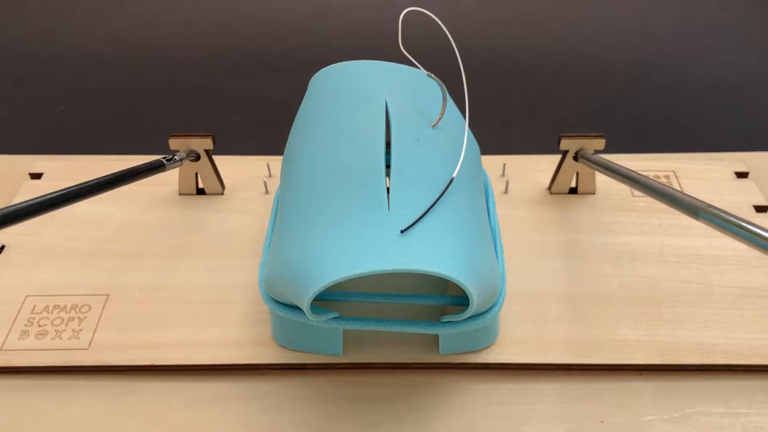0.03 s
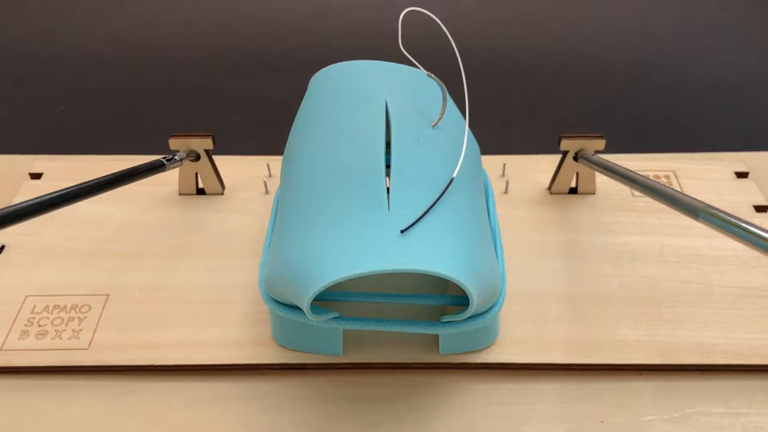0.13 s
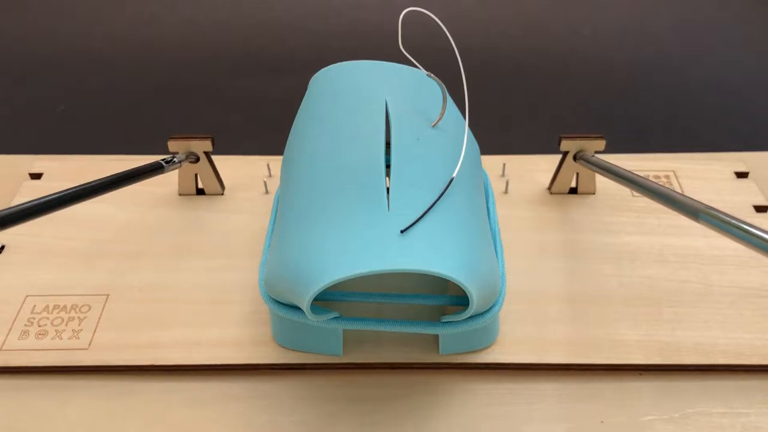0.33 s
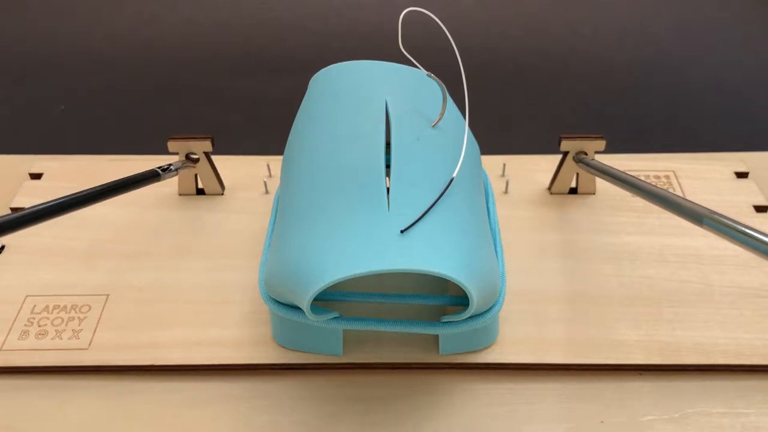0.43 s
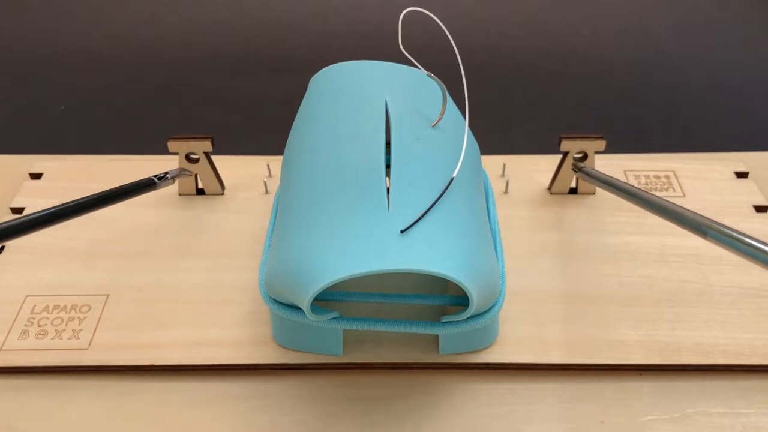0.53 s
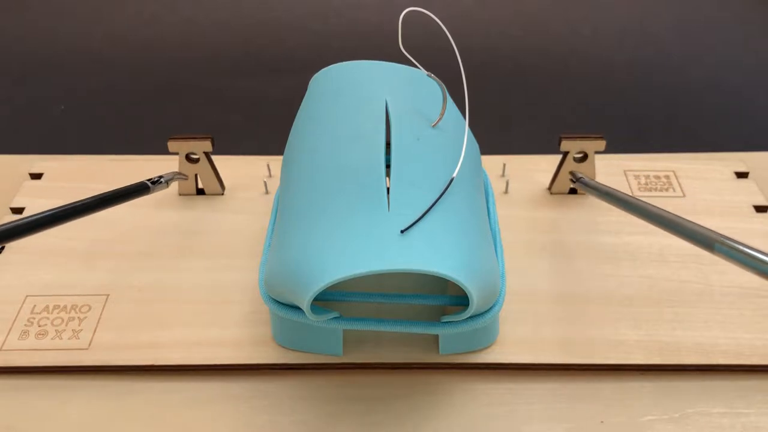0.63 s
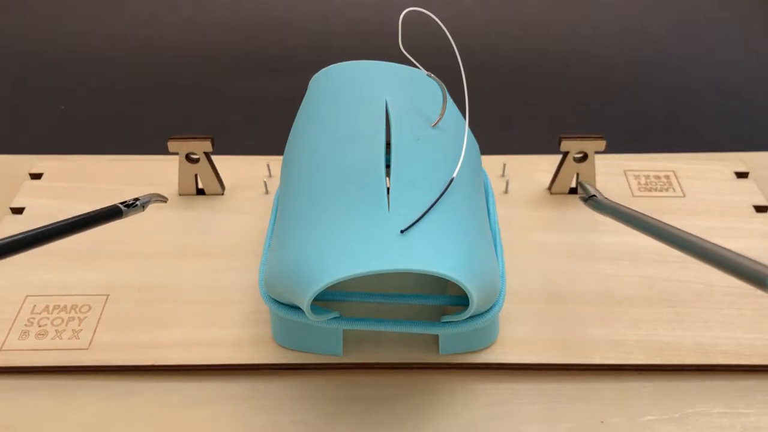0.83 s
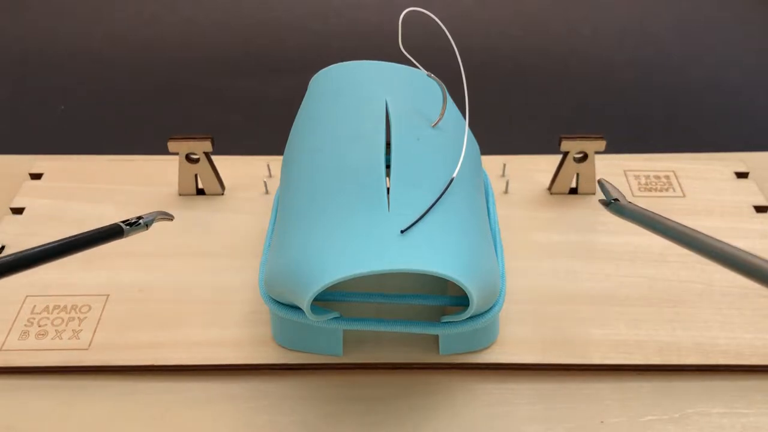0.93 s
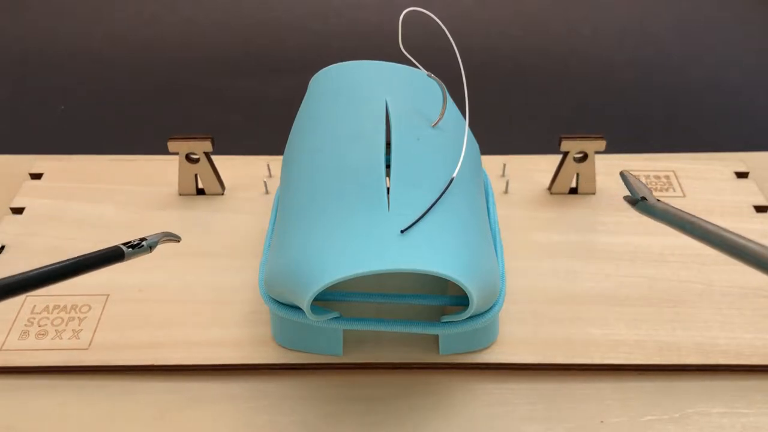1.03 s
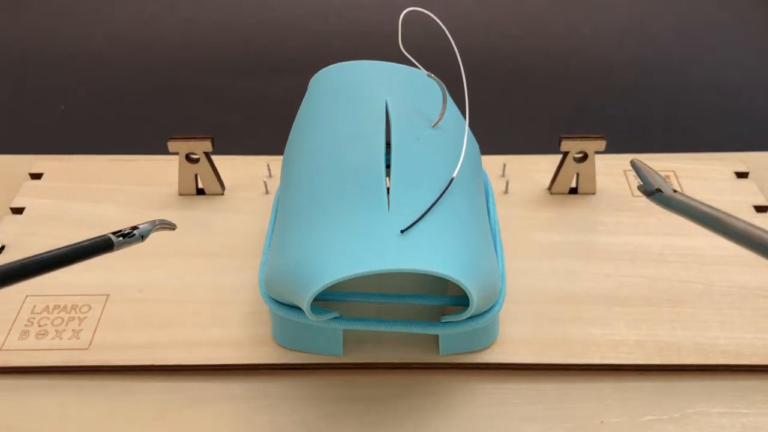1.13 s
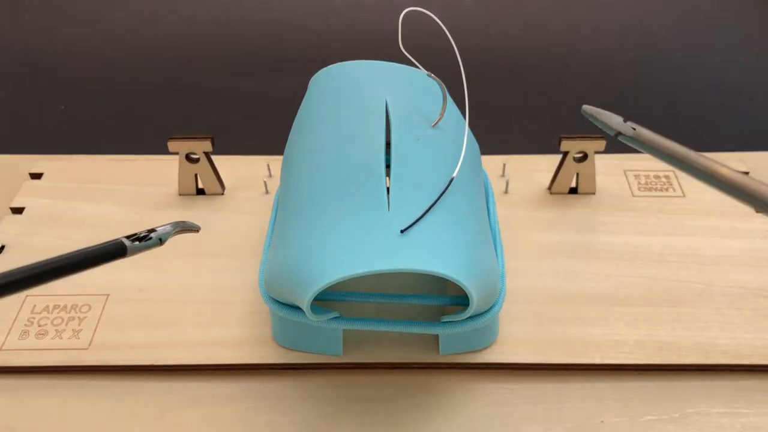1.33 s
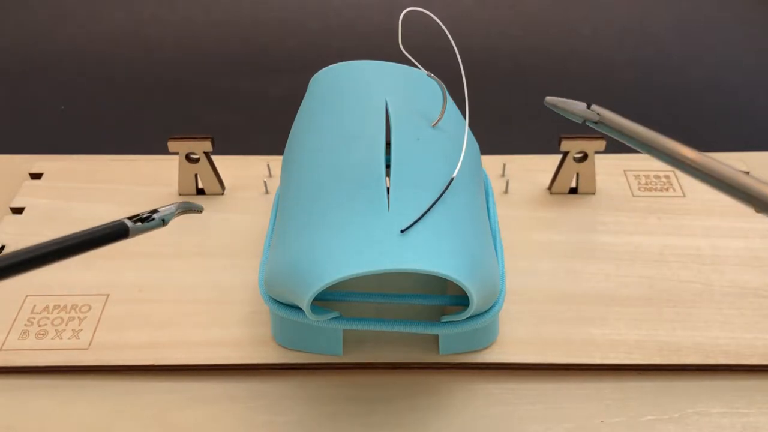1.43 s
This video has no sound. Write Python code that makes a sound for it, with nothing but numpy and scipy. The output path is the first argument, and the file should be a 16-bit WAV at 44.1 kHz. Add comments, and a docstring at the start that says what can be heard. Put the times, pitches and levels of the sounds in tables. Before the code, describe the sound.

Close up in a quiet indoor room, a metal ratchet clicks sharply over a wooden box, a duller tick answers, then very faint scraping and sliding hiss lead to a soft low knock near the end.

```python
"""Two long-handled surgical instruments are worked on a plywood training box in a quiet room.
The grip creaks, then the handle's ratchet snaps over with a bright steel click: struck modes and noise cracks.
The box hums under the jolt, and the lever drops back with a duller tick, again from struck modes.
Next a shaft scrapes in its port (random grains, a falling resonance) and squeaks once, and the shafts slide
as hissing noise. Near the end one catches and knocks on the box, which hums briefly over air and rumble."""
import sys
import numpy as np
from scipy import signal
from scipy.fft import rfft, irfft
from scipy.io import wavfile

SR = 44100
rng = np.random.default_rng(int(sys.argv[2]) if len(sys.argv) > 2 else 0)


def generate_wav(signal):
    """Clip the signal to [-1, 1] and save it as 16-bit WAV at the path in sys.argv[1]."""
    frames = np.transpose(np.atleast_2d(signal))
    scaled = np.clip(frames, -1, 1) * 32767
    pcm = np.round(scaled).astype(np.int16)
    wavfile.write(sys.argv[1], SR, pcm)


N = 66150
TIME = np.arange(N) / SR


def from_db(db):
    """Decibels to gain."""
    return 10 ** (np.asarray(db) / 20)


def rms_one(x):
    """Scale to unit rms."""
    return x / np.sqrt(np.mean(x ** 2) + 1e-20)


def glide(curve):
    """Straight lines over time through (s, value) points."""
    return np.interp(TIME, *np.transpose(curve))


def level(curve):
    """Gain over time from (s, dB) points."""
    return from_db(glide(curve))


def at_hz(points, hz, axis=1):
    """Read a column of a table on a log-frequency axis."""
    table = np.array(points)
    return np.interp(np.log(hz + 1), np.log(table[:, 0]), table[:, axis])


def coloured(spectrum, source=None):
    """Give white noise, or another source, a spectrum; rms 1."""
    if source is None:
        source = rng.standard_normal(N)
    gain = from_db(at_hz(spectrum, np.fft.rfftfreq(N, 1 / SR)))
    return rms_one(irfft(rfft(source) * gain, N))


def drift(knots_per_s):
    """Slow random motion of rms 1, in straight lines between random knots."""
    knots = rng.standard_normal(400)
    return rms_one(np.interp(TIME * knots_per_s, np.arange(len(knots)), knots))


def dying(start, t60):
    """Envelope that jumps to 1 and falls 60 dB in t60 seconds."""
    fall = np.clip((TIME - start) / t60, 0, 10)
    return (TIME >= start) * 1e-3 ** fall


def ring(force, hz, t60):
    """One mode as a two-pole resonator: a unit click rings as a decaying sine of height 1."""
    radius = 1e-3 ** (1 / (t60 * SR))
    w = 2 * np.pi * hz / SR
    # the tiny offset keeps the filter clear of vanishingly small numbers
    return signal.lfilter([0, np.sin(w)], [1, -2 * radius * np.cos(w), radius * radius], force + 1e-18)


def strike(contacts, modes):
    """Contacts, each as soft as its brightness says, set a body's modes ringing."""
    force = np.zeros(N)
    for start, db, brightness_hz in contacts:
        click = np.zeros(N)
        click[int(round(start * SR))] = from_db(db)
        soft = np.exp(-2 * np.pi * brightness_hz / SR)
        force += signal.lfilter([1 - soft], [1, -soft], click)
    sound = np.zeros(N)
    for k, (hz, db, t60) in enumerate(modes):
        sign = (-1) ** k  # neighbouring modes start in opposite directions
        sound += sign * from_db(db) * ring(force, hz, t60)
    return sound


LAG_CORNER_HZ = 4445  # here the delay is half of its value in the deep bass


def disperse(x, lag_s):
    """Delay the lows by up to lag_s, as bending waves in a steel tube do."""
    hz = np.fft.rfftfreq(N, 1 / SR)
    delay = lag_s / (1 + (hz / LAG_CORNER_HZ) ** 4)
    phase = 2 * np.pi * np.cumsum(delay) * SR / N  # the delay is the slope of the phase
    return irfft(rfft(x) * np.exp(-1j * phase), N)


def friction(hz, half_width_hz):
    """Friction noise in one resonance, steady or moving: slow noise on a carrier; rms 1."""
    phase = 2 * np.pi * np.cumsum(hz * np.ones(N)) / SR
    lowpass = signal.butter(2, half_width_hz, fs=SR, output="sos")
    a, b = signal.sosfilt(lowpass, rng.standard_normal((2, N)))
    return rms_one(a * np.cos(phase) + b * np.sin(phase))


# The pawl snaps over and chatters. Each row: start in seconds, level in dB, contact brightness in Hz.
SNAP = [(.20297, -2, 14000), (.2037, 0, 12000), (.20501, -1, 5500), (.20574, -2, 3500)]
# Light touches of the pawl on its teeth. Each row: start in seconds, level in dB, contact brightness in Hz.
TOUCHES = [(.1655, -39.5, 4000), (.1805, -42, 12000), (.1925, -43, 6000), (.1975, -28, 6000),
           (.423, -39.5, 6000)]
# Ring of the handle. Each row: pitch in Hz, level in dB, T60 in seconds.
HANDLE_MODES = [(817, -42.5, 0.064), (1058, -38, 0.041), (1332, -30.5, 0.0075), (2390, -36, .014),
                (3936, -25, 0.015), (4432, -26.5, 0.0094), (5120, -27, .018), (7130, -23.5, .016),
                (8370, -15, 0.013), (9360, -20.5, 0.0078), (11200, -35.5, .01), (12300, -28.5, .008),
                (13500, -38.5, .01)]
# Colour of the crack at each contact. Each row: frequency in Hz, relative level in dB per Hz.
CRACK_COLOUR = [(200, -30.5), (700, -12), (1200, -5), (1800, -8), (2500, -5), (3300, -8.5), (4800, -0.5),
                (5900, -10), (6600, -15), (7300, -3.5), (10000, -4), (13000, -8), (16000, -17.5)]
# The grip creaks under the squeeze. Each row: start in seconds, level in dB, contact brightness in Hz.
CREAKS = [(.168, -5, 3000), (.1705, -3, 3000), (.1895, -5, 2000), (.1925, -1.5, 2000)]
# Ring of the grip. Each row: pitch in Hz, level in dB, T60 in seconds.
GRIP_MODES = [(950, -55.5, .035), (1220, -52, .04), (2750, -58, .025)]
CRACK_DB, CRACK_T60_S, SNAP_LAG_S = -25, .021, .0013


def ratchet():
    """Creak and snap of the handle: modes ring, and each pawl contact adds a short noise crack."""
    contacts = list(SNAP) + list(TOUCHES)
    # separate bursts of noise add in power
    power = sum((from_db(db) * dying(start, CRACK_T60_S)) ** 2 for start, db, _ in contacts)
    crack = from_db(CRACK_DB) * np.sqrt(power) * coloured(CRACK_COLOUR)
    snap = disperse(strike(contacts, HANDLE_MODES) + crack, SNAP_LAG_S)
    return snap + strike(CREAKS, GRIP_MODES)


# Dense spray of the snap that only the room returns. Each row: frequency in Hz, relative level in dB per Hz.
SPRAY_COLOUR = [(300, -18), (800, -10), (1700, -13), (2500, -2.5), (3200, -7.5), (4000, -1), (4950, -3),
                (5600, -16.5), (6700, -8.5), (7300, -6.5), (7750, -7.5), (8250, -1), (8700, -0.5),
                (9400, -7), (10000, -10.5), (11000, -11), (11900, -14.5), (12700, -11), (15500, -18)]
SPRAY_DB = -45.5


def snap_spray():
    """A coloured click at the second snap contact, meant for the room alone."""
    click = signal.unit_impulse(N, int(SNAP[1][0] * SR))
    return from_db(SPRAY_DB) * coloured(SPRAY_COLOUR, click)


# The lever drops back. Each row: start in seconds, level in dB, contact brightness in Hz.
RETURNS = [(.3776, -0.5, 14000), (.3905, -1, 248), (.4941, -20.5, 4970)]
# Ring of the lever. Each row: pitch in Hz, level in dB, T60 in seconds.
LEVER_MODES = [(740, -46, 0.021), (1400, -34, 0.0082), (1605, -36, 0.015), (2420, -38.5, 0.0097),
               (3430, -34, 0.012), (3660, -32.5, 0.0088), (5200, -31, 0.0049), (7960, -37, 0.0025),
               (11500, -42.5, 0.0058), (12900, -42, .004), (15500, -48, .003)]
LEVER_LAG_S = .00031


def lever_return():
    """The returning lever's contacts ring its modes, the lows a little late."""
    return disperse(strike(RETURNS, LEVER_MODES), LEVER_LAG_S)


# A shaft catches in its port. Each row: start in seconds, level in dB, T60 in seconds.
CATCHES = [(1.379, -49.5, 0.034), (1.3853, -53, 0.046)]
# Colour of the catch. Each row: frequency in Hz, relative level in dB per Hz.
CATCH_COLOUR = [(200, 4.5), (900, -1), (2100, 6.5), (2900, -6.5), (3700, -2.5), (7000, -4.5), (15000, -18)]
# Jolts that reach the box. Each row: start in seconds, level in dB, contact brightness in Hz.
JOLTS = [(.207, 0.5, 496), (.235, 9, 308), (1.385, 0, 602), (1.4265, 0.5, 297.5)]
# Hum of the plywood box. Each row: pitch in Hz, level in dB, T60 in seconds.
BOX_MODES = [(92, -67, 0.6), (145.1, -66.5, 0.17), (190.4, -53, 0.25), (236, -59, .2), (358.7, -64.5, 0.18),
             (474.5, -64.5, .25)]


def knocks():
    """A shaft catches in its port as dying noise; jolts make the plywood box hum in its modes."""
    burst = sum(from_db(db) * dying(start, t60) for start, db, t60 in CATCHES)
    return burst * coloured(CATCH_COLOUR) + strike(JOLTS, BOX_MODES)


# Dry scrape of the shafts in their ports. Each row: time in seconds, level in dB.
SCRAPE_LEVEL = [(.38, -98), (.41, -66), (.48, -64), (.505, -70.5), (.532, -55.5), (.548, -69), (.6, -83),
                (.95, -88), (1.02, -69), (1.16, -74.5), (1.25, -83)]
# Colour of the scrape. Each row: frequency in Hz, relative level in dB per Hz.
SCRAPE_COLOUR = [(300, -16), (800, 0), (1250, 0), (2000, -4), (3000, -6), (3800, -0.5), (4600, -10),
                 (5400, -8), (6500, -19.5), (15000, -30.5)]
# The scrape's resonance falls as the shaft slows. Each row: time in seconds, pitch in Hz, level in dB.
DRAG = [(0.472, 4000, -89), (.492, 3946, -66), (.52, 3650, -61.5), (0.53, 2944, -56), (.539, 1066, -63),
        (.552, 700, -94)]
SCRAPE_GRAINS_PER_S, DRAG_HALF_WIDTH_HZ = 7500, 600


def scraping():
    """Dry random grains and a falling resonance as a shaft rubs in its port."""
    hits = rng.random(N) < SCRAPE_GRAINS_PER_S / SR
    grains = hits * rng.standard_normal(N)
    s, hz, db = np.transpose(DRAG)
    drag_gain = np.interp(TIME, s, from_db(db), left=0, right=0)
    drag = drag_gain * friction(np.interp(TIME, s, hz), DRAG_HALF_WIDTH_HZ)
    return level(SCRAPE_LEVEL) * coloured(SCRAPE_COLOUR, grains) + drag


# Smooth hiss of the sliding shafts. Each row: time in seconds, level in dB.
SLIDE_LEVEL = [(.3, -100), (.45, -82), (.58, -70.5), (.76, -67.5), (.88, -67), (1.1, -66), (1.2, -67.5),
               (1.275, -78.5), (1.32, -80), (1.37, -69), (1.44, -68), (1.5, -76.5)]
# Colour of the slide. Each row: frequency in Hz, relative level in dB per Hz.
SLIDE_COLOUR = [(500, -10), (1500, -4.5), (3200, -6), (4400, -6), (5200, -6.5), (5650, 0), (7200, -2),
                (8200, -5), (9700, -9.5), (11000, -6.5), (12800, -11.5), (14300, -0.5), (15400, -9),
                (16000, -15)]
# The hiss has a broad peak that wanders with the sliding. Each row: time in seconds, pitch in Hz.
SWISH_PITCH = [(.6, 6350), (.76, 6800), (.94, 5900), (1.02, 6940), (1.2, 7260), (1.42, 5950)]
SWISH_HALF_WIDTH_HZ, SWISH_DB = 500, -9.5  # level against the hiss
# The singing tube: level against the hiss, and the rms of its waver
TUBE_HZ, TUBE_HALF_WIDTH_HZ, TUBE_DB, TUBE_WAVER_DB = 3830, 83, -9, 1.5


def sliding():
    """Smooth hiss with a wandering peak, in which the steel tubes sing faintly and waver."""
    swish = from_db(SWISH_DB) * friction(glide(SWISH_PITCH), SWISH_HALF_WIDTH_HZ)
    tube_gain = from_db(TUBE_DB + TUBE_WAVER_DB * drift(28))
    tube = tube_gain * friction(TUBE_HZ, TUBE_HALF_WIDTH_HZ)
    return level(SLIDE_LEVEL) * (coloured(SLIDE_COLOUR) + swish + tube)


# Brief squeak of the tubes. Each row: centre in seconds, length in seconds, pitch in Hz, level in dB.
SQUEAKS = [(.688, .014, 3860, -65)]
SQUEAK_HALF_WIDTH_HZ = 80


def squeaking():
    """Narrow friction noise that swells and fades in a bell-shaped envelope."""
    sound = np.zeros(N)
    for centre, length, hz, db in SQUEAKS:
        swell = np.exp(-((TIME - centre) / length) ** 2)
        sound += from_db(db) * swell * friction(hz, SQUEAK_HALF_WIDTH_HZ)
    return sound


# The board rustles as the shafts lean on it. Each row: time in seconds, level in dB.
RUSTLE_LEVEL = [(0, -61.5), (.13, -73.5), (.45, -69.5), (.68, -68.5), (.92, -74), (1.03, -63.5),
                (1.16, -69.5), (1.29, -91), (1.4, -53.5), (1.5, -82)]
# Colour of the rustle. Each row: frequency in Hz, relative level in dB per Hz.
RUSTLE_COLOUR = [(60, -3.5), (140, -6.5), (220, 4.5), (330, -8), (470, -5.5), (700, -25), (1500, -20.5),
                 (4000, -30), (15000, -35.5)]


def rustling():
    """Low, uneven noise of the board under the shafts."""
    return level(RUSTLE_LEVEL) * coloured(RUSTLE_COLOUR)


# The room. Each row: frequency in Hz, tail gain in dB, T60 in seconds.
ROOM = [(150, -3.5, .45), (700, -11.5, 0.62), (2500, -11, 0.48), (4500, -14, 0.47), (8400, -7, 0.33),
        (11000, -14, 0.46), (15000, -11.5, .2)]
ROOM_DELAY_S, ROOM_BUILD_S = .0024, .004
EARLY_DB, EARLY_T60_S = -18, .04


def room(x):
    """Quick reflections off the box and table, then a diffuse tail that dies band by band."""
    white, hz = rfft(rng.standard_normal(N)), np.fft.rfftfreq(N, 1 / SR)
    onset = 1 - np.exp(-np.maximum(TIME - ROOM_DELAY_S, 0) / ROOM_BUILD_S)
    early = rms_one(rng.standard_normal(N) * onset * dying(0, EARLY_T60_S))
    response = from_db(EARLY_DB) * early
    edges = np.geomspace(50, 18000, 26)
    for low, high in zip(edges, edges[1:]):
        centre = np.sqrt(low * high)
        band = irfft(white * (hz >= low) * (hz < high), N)
        envelope = rms_one(onset * dying(0, at_hz(ROOM, centre, axis=2)))
        response = response + from_db(at_hz(ROOM, centre)) * envelope * band
    return signal.fftconvolve(x, response / np.sqrt(N))[:N]


# Still air of the room. Each row: frequency in Hz, relative level in dB per Hz.
AIR_COLOUR = [(20, -32.5), (40, -9.5), (65, -3), (110, -7.5), (220, -2.5), (400, -10), (800, -13.5),
              (2000, -25), (6000, -30), (10000, -28.5), (16000, -39.5)]
# Swell of the low rumble. Each row: time in seconds, level in dB.
RUMBLE_LEVEL = [(0, -85), (.51, -78), (.57, -70.5), (.75, -80), (1.05, -73.5), (1.24, -63.5), (1.38, -86),
                (1.5, -76)]
AIR_DB, RUMBLE_HZ, RUMBLE_T60_S = -69.5, 66, .4


def background():
    """Still air as coloured noise, and a low rumble as noise through one resonance."""
    rumble = rms_one(ring(rng.standard_normal(N), RUMBLE_HZ, RUMBLE_T60_S))
    return from_db(AIR_DB) * coloured(AIR_COLOUR) + level(RUMBLE_LEVEL) * rumble


# How strongly each source feeds the room
HANDLE_ROOM_DB, LEVER_ROOM_DB, KNOCK_ROOM_DB = -7, -6.5, -.5


def scene():
    """Handle, lever and box in the room, over the moving shafts and the background."""
    handle, lever, box = ratchet(), lever_return(), knocks()
    to_room = snap_spray() + from_db(HANDLE_ROOM_DB) * handle
    to_room = to_room + from_db(LEVER_ROOM_DB) * lever + from_db(KNOCK_ROOM_DB) * box
    struck = handle + lever + box + room(to_room)
    rubbed = scraping() + sliding() + squeaking() + rustling()
    return (struck + rubbed + background())[None]


PEAK_TOP, CUTOFF_HZ = .54, 15800  # height that peaks are rounded towards, and the steep top cut


def record(dry):
    """Peaks are rounded, the deepest bass rolls off and the top is cut steeply."""
    rounded = PEAK_TOP * np.tanh(dry / PEAK_TOP)
    thinned = signal.sosfilt(signal.butter(3, 40, "high", fs=SR, output="sos"), rounded)
    return signal.sosfilt(signal.ellip(10, .1, 70, CUTOFF_HZ, fs=SR, output="sos"), thinned)


dry = scene()
out = record(dry)
generate_wav(out)
```